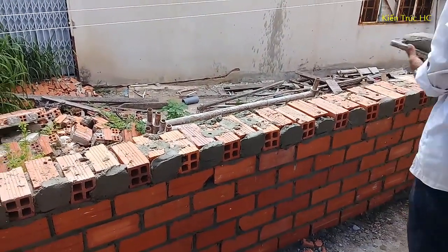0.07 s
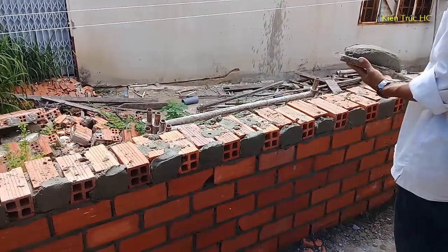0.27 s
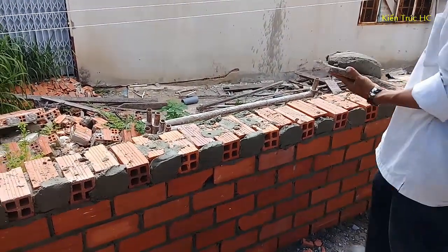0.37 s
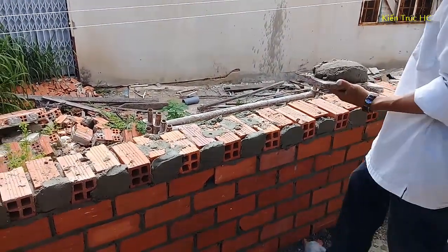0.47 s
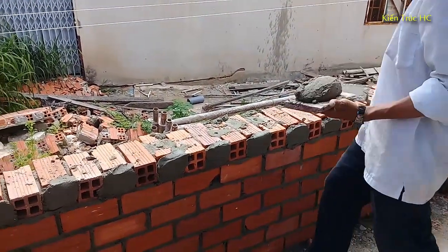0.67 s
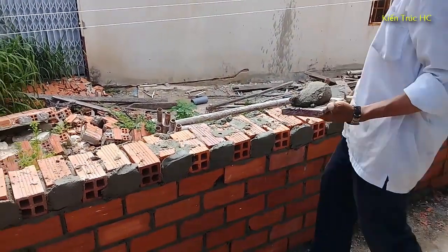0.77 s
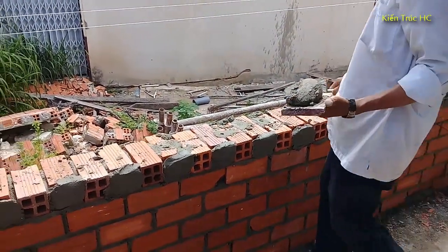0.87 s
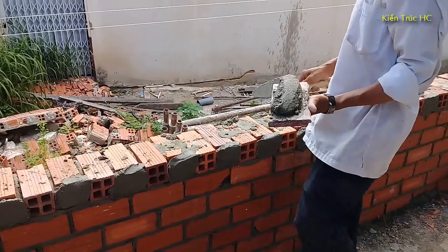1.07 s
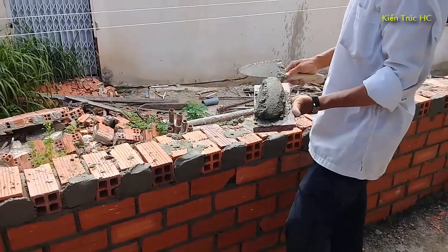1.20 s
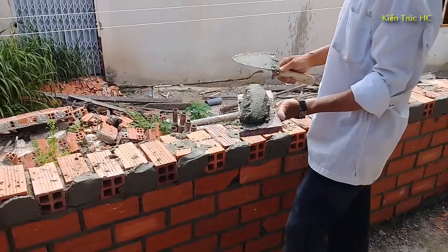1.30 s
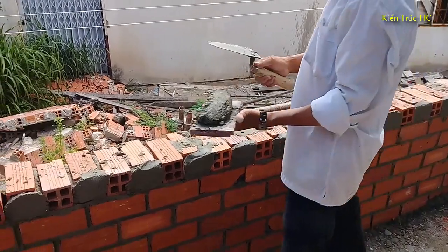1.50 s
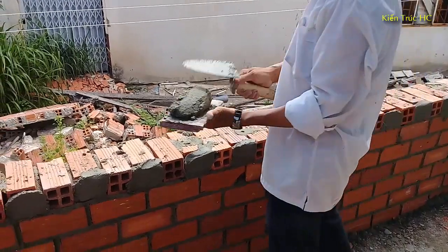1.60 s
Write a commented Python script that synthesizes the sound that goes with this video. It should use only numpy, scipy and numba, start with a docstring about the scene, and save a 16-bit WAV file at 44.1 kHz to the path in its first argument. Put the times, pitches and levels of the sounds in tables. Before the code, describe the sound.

A sharp, hollow trowel knock echoes in a yard, followed by duller bumps and faint scraping.

```python
"""A walled yard, bricklaying. A steel trowel clinks and its blade rings on; a hard hollow knock echoes
between the walls and drives a limiter, and duller bumps follow. The trowel scrapes mortar on the hand
board, setting both ringing, then taps it. Grit crunches under soft footfalls, and one thin whistle,
perhaps a bird, sounds over a quiet background."""
import sys
import numpy as np
from scipy import signal
from scipy.fft import rfft, irfft
from scipy.io import wavfile
from scipy.ndimage import uniform_filter1d, minimum_filter1d
from numba import njit

SR = 44100
rng = np.random.default_rng(int(sys.argv[2]) if len(sys.argv) > 2 else 0)


def master(y):
    """Save y as 16-bit WAV."""
    cut = np.clip(np.atleast_2d(y).T, -1, 1)
    pcm = np.round(cut * 32767)  # scale
    wavfile.write(sys.argv[1], SR, pcm.astype(np.int16))


N = 72765

# strike on the trowel blade: t/s, level/dB, echo/dB
CLINK_HITS = [(.065, -2.5, 7.5)]
# hard knock: t/s, level/dB, echo/dB
KNOCK_HITS = [(0.2103, -4.5, 7)]


def undb(db):
    """Decibels to gain."""
    return 10 ** (np.asarray(db) / 20)


def clock():
    """Sample times in s."""
    return np.arange(N) / SR


def at_hz(points, hz):
    """Interpolate (f/Hz, value) points on a log-frequency axis."""
    f, values = np.array(points, float).T
    return np.interp(np.log(np.maximum(hz, 1)), np.log(f), values)


def through(x, impulse):
    """Convolve, cut to N samples."""
    return signal.fftconvolve(x, impulse)[:N]


def colour(x, spectrum):
    """Minimum-phase filter of the given spectral shape; keeps the power of white noise."""
    size = 4096
    hz = np.arange(size // 2 + 1) * SR / size
    cepstrum = irfft(np.log(undb(at_hz(spectrum, hz))))
    cepstrum[1:size // 2] *= 2
    cepstrum[size // 2 + 1:] = 0
    impulse = irfft(np.exp(rfft(cepstrum)))
    return through(x, impulse / np.linalg.norm(impulse))


def fade(t, t60_s):
    """Exponential decay, 60 dB in t60_s."""
    return np.exp(-np.log(1000) * np.maximum(t, 0) / t60_s)


def late(x, delay_s):
    """Delay, cut to N samples."""
    return np.concatenate([np.zeros(max(int(delay_s * SR), 0)), x])[:N]


def grains(spread):
    """Noise in 24-sample grains of log-normal strength, rms 1."""
    size = 24
    noise = rng.standard_normal(N)
    strength = np.exp(spread * rng.standard_normal(N // size + 1))
    noise *= np.repeat(strength, size)[:N]
    return noise / noise.std()


def swells(rows):
    """Power sum of attack-and-fade envelopes."""
    t, power = clock(), 0
    for start_s, attack_s, t60_s, db in rows:
        attack = np.clip((t - start_s) / attack_s, 0, 1)
        power += (undb(db) * attack * fade(t - start_s - attack_s, t60_s)) ** 2
    return np.sqrt(power)


def ring(modes, build_s, detune=0):
    """Decaying modes of a struck object: random polarity, random relative detuning, a swelling onset."""
    t, tone = clock(), 0
    for hz, db, t60_s in modes:
        polarity = rng.choice([-1, 1])
        tuned_hz = hz * (1 + detune * rng.standard_normal())
        tone += polarity * undb(db) * fade(t, t60_s) * np.sin(2 * np.pi * tuned_hz * t)
    return (1 - np.exp(-t / build_s)) * tone


def yard_echo(build_s=0.017):
    """Wall reflections build up, then die away, treble first; unit-energy impulse response."""
    # reverberation by band: f/Hz, t60/s
    decay_times = [(100, 0.78), (400, 0.69), (1000, 0.51), (2000, 0.51), (4000, 0.45), (12000, 0.47)]
    t, hz = clock(), np.arange(N // 2 + 1) * SR / N
    spectrum, echo = rfft(grains(spread=.28)), 0
    for band_hz, t60_s in decay_times:
        band = at_hz([(f, f == band_hz) for f, _ in decay_times], hz)
        echo += irfft(spectrum * band, N) * fade(t, t60_s)
    echo *= 1 - np.exp(-t / build_s) / 2
    return echo / np.linalg.norm(echo)


def blows(hits, spectrum, modes, crack_db, ring_db, crack_t60_s, build_s, detune=0):
    """Each blow: a noise crack, its wall echo and the ring of the thing struck."""
    noise, tone = 0, 0
    for start_s, db, echo_db in hits:
        crack = rng.standard_normal(N) * fade(clock(), crack_t60_s)
        crack /= np.linalg.norm(crack)
        noise += undb(db) * late(crack + undb(echo_db) * yard_echo(), start_s)
        tone += undb(db) * late(ring(modes, build_s, detune), start_s)
    return undb(crack_db) * np.sqrt(SR) * colour(noise, spectrum) + undb(ring_db) * tone


def air():
    """Quiet, steady outdoor noise, mostly bass."""
    # background spectrum: f/Hz, level/dB
    spectrum = [(25, -21), (130, -11.5), (400, -26.5), (800, -29.5), (2000, -33.5), (3100, -34),
                (4300, -44.5), (6500, -47.5), (15500, -58.5)]
    return undb(-51) * colour(rng.standard_normal(N), spectrum)


def feet():
    """Grit crunches under shoes; footfalls thud softly."""
    # crunches and footfalls: t/s, attack/s, t60/s, level/dB
    crunches = [(0, 0.0074, 2.3, -3.5), (.14, 0.011, 1.5, 9.5), (.54, 0.034, 1.1, -3),
                (.66, 0.069, 1.2, 2.5), (.893, 0.0058, 0.79, 0), (1.29, 0.013, 1, -1.5)]
    footfalls = [(.002, 0.028, 0.82, 13), (.63, 0.0084, 0.73, 14.5), (1.133, 0.0078, 0.35, -4.5)]
    # their spectra: f/Hz, level/dB
    grit_spectrum = [(300, -7.5), (1500, 8), (4300, -6), (5500, -6), (9000, -11), (15500, -19.5)]
    thud_spectrum = [(30, -24), (70, -9), (150, -4), (300, -11.5), (800, -6.5), (2000, -44)]
    grit = colour(grains(spread=0.38) * swells(crunches), grit_spectrum)
    thuds = colour(rng.standard_normal(N) * swells(footfalls), thud_spectrum)
    return undb(-50) * grit + undb(-53) * thuds


def clink():
    """The steel trowel blade is struck and rings."""
    # crack spectrum: f/Hz, level/dB
    spectrum = [(80, -17), (140, -6), (650, -10), (1530, -0.5), (2100, -7.5), (2970, -8.5), (3500, -27.5),
                (15500, -36.5)]
    # blade modes: f/Hz, level/dB, t60/s
    modes = [(1592, -11, .4), (2590, 3, .42), (2906, 4, .48), (3112, -9, .45), (4145, -12.5, .33),
             (5390, -15, .3), (6794, -21, .44), (8060, -19.5, .38), (8807, -18.5, .35)]
    return blows(CLINK_HITS, spectrum, modes, crack_db=-46, ring_db=-27.5, crack_t60_s=0.011,
                 build_s=0.027)


def blade_afterring(t60_s=4):
    """Lightly damped steel sings faintly long after the clink."""
    # lingering blade modes: f/Hz, level/dB
    partials = [(2600, -2), (2990, -1), (3040, 0), (3330, -6), (3693, -6), (5380, -9)]
    modes = [(hz, db, t60_s) for hz, db in partials]
    return undb(-53) * late(ring(modes, build_s=0.027), CLINK_HITS[0][0])


def bumps():
    """Dull blows whose ring shifts in pitch from one to the next."""
    # bumps: t/s, level/dB, echo/dB
    hits = [(.2009, -1.5, -5), (.575, -16.5, 9), (.624, -16, 13.5), (.655, -15, 2), (.6705, -2, 0.5),
            (.681, -5.5, -0.5), (.694, -9, 0), (.719, -17.5, 3), (.735, -15.5, -18), (1.618, -15, -6)]
    # crack spectrum: f/Hz, level/dB
    spectrum = [(50, -40.5), (140, -14), (300, -16), (550, -9), (830, -5.5), (1100, -2), (1800, -11.5),
                (3340, -32), (15500, -53.5)]
    # bump modes: f/Hz, level/dB, t60/s
    modes = [(1055, 1, .22), (1125, -2, .15), (1200, -4, .11)]
    return blows(hits, spectrum, modes, crack_db=-42.5, ring_db=-25, crack_t60_s=.035,
                 build_s=0.0032, detune=.025)


def knock():
    """One hard blow with a hollow ring and a strong wall echo."""
    # crack spectrum: f/Hz, level/dB
    spectrum = [(60, -33), (170, -13.5), (560, -11.5), (830, -1.5), (1350, 0.5), (3000, -14.5), (5500, -25),
                (8000, -38), (15500, -43)]
    # hollow modes: f/Hz, level/dB, t60/s
    modes = [(709, -9, .62), (832, 0, .55), (984, -4, .55), (1094, -1, .6), (1330, 1, .5), (1395, -3, .55),
             (1484, -3, .5), (1735, -7, .55), (1848, -6, .6), (2346, -11, .45), (4263, -19, .35)]
    return blows(KNOCK_HITS, spectrum, modes, crack_db=-18.5, ring_db=-9.5, crack_t60_s=0.104,
                 build_s=0.0032)


def snap():
    """Hard faces meet: a bright noise burst starts the knock."""
    # burst spectrum: f/Hz, level/dB
    spectrum = [(800, -3), (4000, 0), (8000, -8), (15500, -30)]
    burst = rng.standard_normal(N) * fade(clock(), t60_s=.01)
    return undb(-10) * late(colour(burst, spectrum), KNOCK_HITS[0][0])


def whistle(echo_db=-3):
    """A faint pure note slides up, holds and echoes."""
    # note contour: t/s, f/Hz, level/dB
    contour = [(.8, 2470, -60), (.818, 2580, -52), (.872, 2612, -48.5), (.89, 2615, -64)]
    times_s, hz, db = np.array(contour).T
    t = clock()
    rms = np.interp(t, times_s, undb(db), left=0, right=0)
    phase = 2 * np.pi * np.cumsum(np.interp(t, times_s, hz)) / SR
    note = np.sqrt(2) * rms * np.sin(phase)
    return note + undb(echo_db) * through(note, yard_echo())


def scraping(sand_db=-30, ring_db=-36.5):
    """Sand grinds under the blade; each stroke sets blade and board ringing."""
    # strokes through mortar: t/s, attack/s, t60/s, level/dB
    strokes = [(1.296, 0.0027, 0.36, -16), (1.339, 0.0057, 0.67, 0), (1.458, .008, 1, -10.5)]
    # grinding spectrum: f/Hz, level/dB
    spectrum = [(100, -12), (230, -3.5), (520, -12), (800, 1.5), (1020, -5.5), (2370, -8.5), (4100, -23.5),
                (5500, -23), (7500, -31.5), (15500, -42)]
    # blade and board modes: f/Hz, level/dB, t60/s
    modes = [(728, -4, .48), (866, -1.5, .48), (1190, -7, .35), (1550, -5, .45), (2322, -4, .6),
             (2428, -8, .55), (2860, -2, .47), (3490, -10, .45), (5588, -17, .4), (8650, -19, .36)]
    sand = colour(grains(spread=.45) * swells(strokes), spectrum)
    board = sum(undb(db) * late(ring(modes, build_s=0.01), start_s) for start_s, _, _, db in strokes)
    return undb(sand_db) * sand + undb(ring_db) * board


def taps():
    """The trowel taps the board; the ring dies quickly."""
    # taps: t/s, level/dB, echo/dB
    hits = [(1.5618, -5, -12), (1.5637, 1.5, -12), (1.576, -7, -9), (1.582, -5, -7), (1.624, -12, -9),
            (1.637, -14, -7)]
    # crack spectrum: f/Hz, level/dB
    spectrum = [(150, -6), (420, -16), (820, -7), (1150, -12.5), (1560, 1), (2360, -5.5), (3280, -15.5),
                (6300, -23), (7200, -31), (15500, -39.5)]
    # tap modes: f/Hz, level/dB, t60/s
    modes = [(880, -6, .06), (1555, 1, .055), (2300, -2, .05)]
    return blows(hits, spectrum, modes, crack_db=-50, ring_db=-36, crack_t60_s=.014, build_s=0.00077)


def scene():
    """Work sounds, whistle and background, mono."""
    strikes = knock() + bumps() + clink() + taps()
    return (strikes + air() + snap() + blade_afterring() + scraping() + feet() + whistle())[None]


@njit
def peak_follower(x, decay):
    """Instant attack, exponential release."""
    envelope, peak = np.empty(len(x)), 0.
    for i in range(len(x)):
        peak = max(abs(x[i]), peak * decay)
        envelope[i] = peak
    return envelope


def record(dry):
    """A fast limiter holds down the knock; clipper and steep low-pass follow."""
    limit, release_s, ceiling, cutoff_hz = 0.74, 0.0049, .97, 15800
    peak = peak_follower(dry[0], np.exp(-1 / (release_s * SR)))
    gain = np.minimum(1, limit / (peak + 1e-9))
    smooth_gain = uniform_filter1d(minimum_filter1d(gain, size=16), size=32)
    limited = np.clip(dry * smooth_gain, -ceiling, ceiling)
    lowpass = signal.ellip(8, .2, 70, cutoff_hz, fs=SR, output="sos")
    return signal.sosfilt(lowpass, limited)


dry = scene()
out = record(dry)
master(out)
```